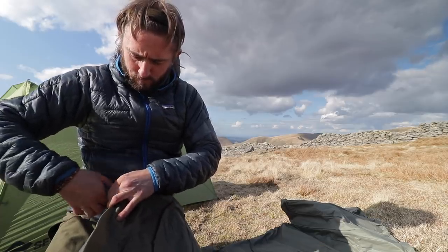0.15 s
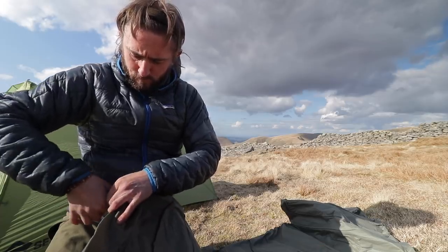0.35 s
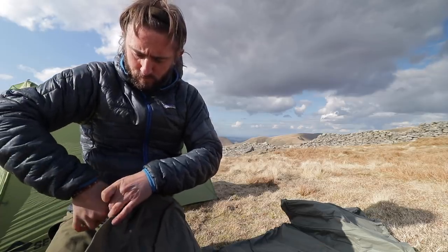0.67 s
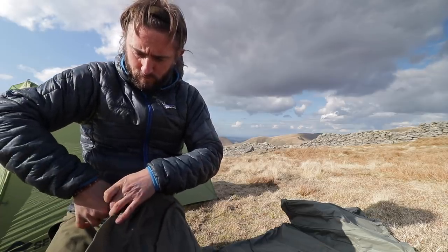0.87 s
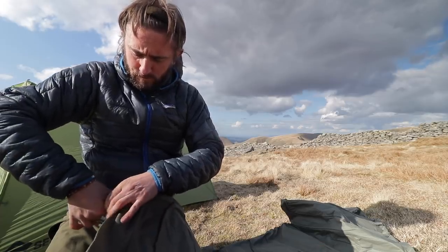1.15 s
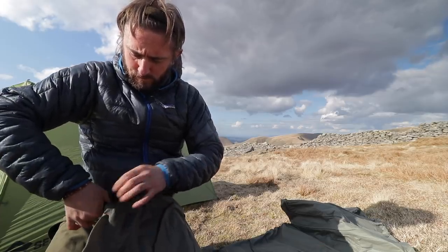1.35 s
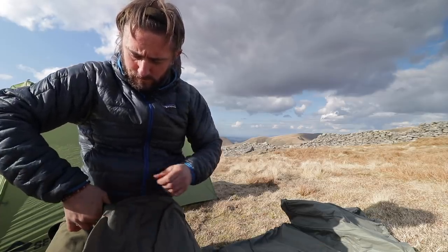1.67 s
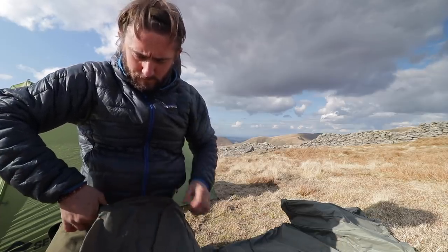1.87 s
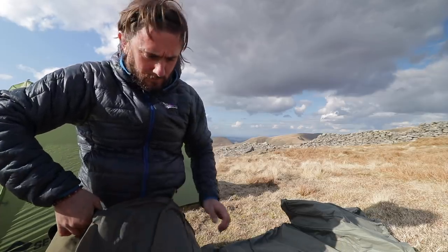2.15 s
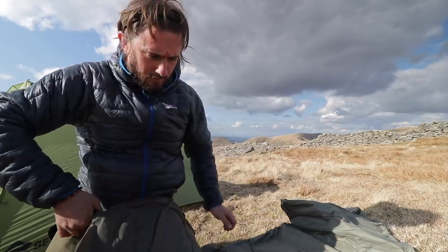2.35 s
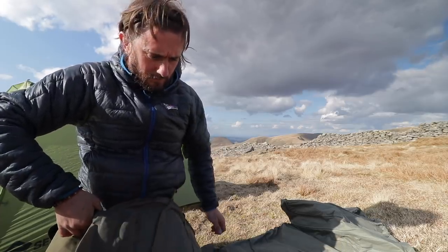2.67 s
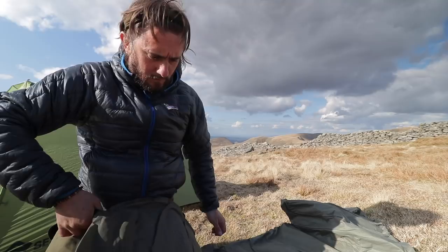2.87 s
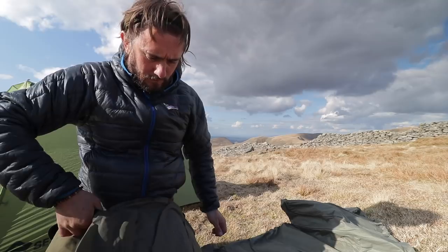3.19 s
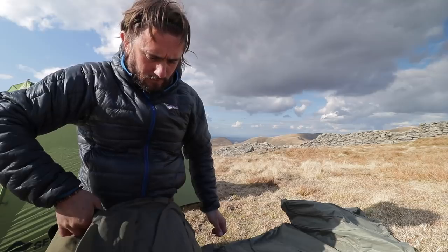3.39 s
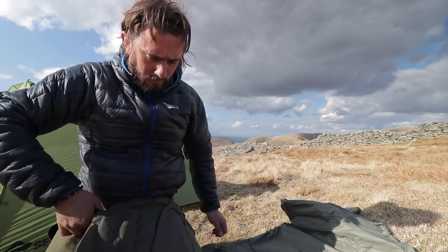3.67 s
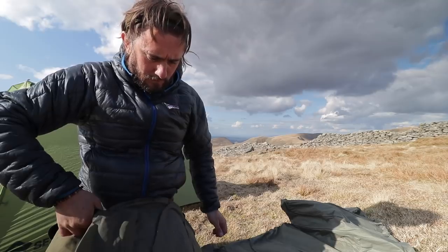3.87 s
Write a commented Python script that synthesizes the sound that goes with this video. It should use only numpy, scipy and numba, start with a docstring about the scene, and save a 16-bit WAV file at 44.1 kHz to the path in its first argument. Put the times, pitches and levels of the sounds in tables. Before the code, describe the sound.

A palm-sized electric pump blows air into a sleeping mat on an open hilltop, about a metre from the microphone. Its bright, rushing hiss and thin whine flutter while fingers work at the valve, with two faint dull knocks, then settle into an even drone once the hand lifts away. Soft low wind puffs sit underneath.

```python
"""A palm-sized battery pump blows air into a sleeping mat on a windy hilltop, a metre from one microphone.
Noise through resonances makes the rushing air; sines on multiples of the shaft speed make the impeller's whine.
A hand working round the valve shades the air and the tones, then lifts away; two dull knocks are its nudges.
Low filtered noise, swelling in puffs, is light wind on the microphone over a faint far hush."""
import sys
import numpy as np
from scipy import signal
from scipy.io import wavfile
from scipy.ndimage import uniform_filter1d
from numba import njit

SR = 44100
rng = np.random.default_rng(int(sys.argv[2]) if len(sys.argv) > 2 else 0)


def level_to_linear(level):
    """Convert decibel levels to linear amplitude factors, elementwise."""
    exponent = np.asarray(level, float) / 20
    return 10 ** exponent


def unload_audio(sound):
    """Save the sound as a 16-bit wav file, at the path given as the first command line argument."""
    columns = np.transpose(np.atleast_2d(sound))
    # keep every value between -1 and 1, then stretch to whole-number steps
    steps = np.round(np.clip(columns, -1, 1) * 32767)
    wavfile.write(sys.argv[1], SR, steps.astype(np.int16))


N = 177365
T = np.arange(N) / SR
AIR_FLICKER_DB, FLICKER_RATE_HZ = 0.35, 12


def curves(table):
    """Draws each column of a table as a line through time."""
    times, *columns = np.transpose(table)
    return [np.interp(T, times, column) for column in columns]


def bump(centre_s, length_s):
    """A smooth rise and fall from 0 to 1 and back."""
    phase = np.clip((T - centre_s) / length_s, -0.5, 0.5)
    return np.cos(np.pi * phase) ** 2


def walk(rate_hz):
    """Random levels, each held for 1 / rate and smoothed twice; their spread is near 1."""
    hold = int(SR / rate_hz)
    steps = np.repeat(rng.standard_normal(N // hold + 1), hold)
    smooth = uniform_filter1d(uniform_filter1d(steps, hold), hold)
    return 1.38 * smooth[:N]


@njit
def band_pass(x, hz, width_hz):
    """A resonance whose centre may move; a tone at the centre passes at its own level."""
    y, band, low = np.empty(len(x)), 0., 0.
    for i in range(len(x)):
        g = np.tan(np.pi * hz[i] / SR)
        damping = np.pi * width_hz / SR * (1 + g * g) / g
        v = (band + g * (x[i] - low)) / (1 + g * (g + damping))
        band, low, y[i] = 2 * v - band, low + 2 * g * v, damping * v
    return y


def ring(hz, width_hz, flicker_db):
    """Turbulence (noise) through the same resonance twice, set to rms 1, then flickering in level."""
    centre = hz * np.ones(N)
    air = rng.standard_normal(N)
    for _ in range(2):
        air = band_pass(air, centre, 1. * width_hz)
    return air / air.std() * level_to_linear(flicker_db * walk(FLICKER_RATE_HZ))


def rush(modes, flicker_db):
    """A group of resonances, each fed by its own eddies."""
    return sum(level_to_linear(db) * ring(hz, width, flicker_db) for hz, width, db in modes)


# fingers working on the valve: (time [s], cover [0-1], intake ring [Hz])
FINGERS = [(0.0, 0.09, 7050), (0.12, 0.03, 6950), (0.2, 0.3, 7100), (0.29, 0.54, 7400), (0.42, 1.0, 7480),
           (0.54, 0.76, 7500), (0.63, 0.7, 7350), (0.71, 0.57, 7800), (0.79, 0.62, 7250),
           (0.92, 0.44, 7500), (1.0, 0.5, 7300), (1.09, 0.55, 7300), (1.2, 0.3, 7230), (1.3, 0.44, 7300),
           (1.42, 0.44, 7260), (1.56, 0.22, 7060), (1.75, 0.0, 7340), (2.1, 0.17, 7120)]


def hand():
    """Shares of three hand positions (on the valve, hovering, gone), then the finger cover."""
    lifted = np.clip((T - 1.2) / 0.15, 0, 1)  # (T - start [s]) / time the move takes [s]
    gone = np.clip((T - 1.955) / 0.17, 0, 1)
    cover = curves(FINGERS)[0]
    return np.array([1 - lifted, lifted - gone, gone, cover])


# resonances of each air path, relative levels: (centre [Hz], width of each filter pass [Hz], level [dB])
HOUSING = [(1380, 510, -5.5), (1966, 710, -5), (2536, 790, -2.5), (3350, 530, -18)]
MAT = [(323, 140, -20.5), (473, 244, -11), (754, 430, 1)]
NOZZLE = [(3972, 470, 0)]
NOZZLE_UPPER = [(4467, 700, 1.5), (5360, 1050, -11.5)]
GAP = [(5800, 1400, -1.1), (6600, 900, -1.7)]
LEAK = [(8025, 340, 1), (8780, 2500, -0.5), (9820, 500, -1.2)]
TOP = [(10950, 1300, -5), (12250, 500, -13), (12300, 1200, -15), (12900, 510, -6.5), (13600, 800, -7.5),
       (14600, 900, -8), (15400, 900, -13)]
# how the hand sets each path's level; rows: housing, mat, nozzle, upper nozzle, gap, intake, leak, top
# (hand on valve [dB], hovering [dB], gone [dB], change at full cover [dB])
PATH_LEVELS = [(-41, -40.5, -41, -1.5), (-53, -52.5, -51.5, -0.5), (-47, -46, -49, -1.5),
               (-45, -47, -44.5, -10.5), (-46, -46.5, -52, -11.5), (-43.5, -41.5, -41.5, -7),
               (-59.5, -51, -53.5, 0.5), (-52, -51, -53, 1)]
# one band of the rushing air swells or fades for a moment:
# (centre time [s], length [s], path [name], change [dB])
AIR_SWELLS = [(0.039, 0.38, "housing", 1.5), (0.24, 0.56, "nozzle", -6), (0.58, .15, "nozzle", -4),
              (1.72, .5, "gap", 1), (0.45, .4, "gap", -3), (1.75, .45, "intake", 1.5),
              (1.17, .25, "gap", -4), (0.68, .16, "gap", 4), (1.58, .1, "leak", 3),
              (0.82, .12, "intake", -3), (0.99, 0.17, "nozzle", 5), (1.2, .25, "nozzle", 2),
              (0.29, 0.28, "intake", -7), (0.65, 0.27, "intake", 4), (0.99, .3, "intake", 1.5),
              (0.85, 0.56, "upper", -7.5), (1.28, 0.23, "upper", -7), (0.31, .4, "leak", 3.5),
              (0.85, .3, "top", -4), (1.08, .2, "top", 1), (1.38, .15, "gap", 4), (2.11, .2, "leak", -3.5)]


def airflow():
    """Rushing air rings each path; the hand shades every path differently and slides the intake's ring."""
    intake = [(curves(FINGERS)[1], 1000, -1)]  # centre [Hz], width [Hz], level [dB]
    paths = dict(housing=HOUSING, mat=MAT, nozzle=NOZZLE, upper=NOZZLE_UPPER,
                 gap=GAP, intake=intake, leak=LEAK, top=TOP)
    pose = hand()
    _, hovering, gone, _ = pose
    levels_db = dict(zip(paths, np.array(PATH_LEVELS) @ pose))
    for centre, length, name, db in AIR_SWELLS:
        levels_db[name] = levels_db[name] + db * bump(centre, length)
    # while the hand is near, its small movements stir the treble paths
    for name in "upper", "gap", "intake", "leak":
        levels_db[name] = levels_db[name] + 0.6 * (1 - gone) * walk(9)
    air = sum(level_to_linear(levels_db[name]) * rush(modes, AIR_FLICKER_DB) for name, modes in paths.items())
    # the bounce off the ground weakens a narrow band: centre 1018 Hz, width 93 Hz
    air = air - 0.65 * band_pass(air, 1018 * np.ones(N), 93.)
    # a second dip opens by half as the hand hovers, fully once it has gone
    dip_depth = 0.61 * (hovering / 2 + gone)
    return air - dip_depth * band_pass(air, 2173 * np.ones(N), 170.)


# the fingers part suddenly and close again slowly: (start time [s], length [s], opening [0-1])
PARTINGS = [(-0.05, .28, 0.9), (0.58, .34, 0.7), (0.964, 0.44, 0.65)]


def parted():
    """How far the fingers stand apart: a quick opening, then a slow close."""
    total = 0
    for start, length, opening in PARTINGS:
        opened = np.clip((T - start) / 0.025, 0, 1)
        closing = np.clip(2 - 2 * (T - start) / length, 0, 1)
        total = total + opening * opened * closing
    return total


# shaft speed before its small random hunting: (time [s], speed [Hz])
SHAFT_SPEED = [(0.0, 620.9), (0.17, 618.7), (0.31, 619.1), (0.4, 617.9), (0.63, 616.8), (0.79, 619.2),
               (0.94, 617.9), (0.99, 616.0), (1.25, 619.3), (1.37, 619.0), (1.45, 620.0), (1.53, 618.0),
               (1.68, 623.3), (1.85, 625.6), (1.97, 623.4), (2.11, 625.4), (2.22, 624.4), (2.36, 626.0),
               (2.75, 626.7), (2.86, 628.1), (2.94, 626.5), (3.08, 625.7), (3.2, 627.8), (3.42, 628.5),
               (3.54, 625.8), (3.71, 624.3), (3.8, 622.7), (4.02, 623.6)]
# shaft tones that the hand shades: (multiple of shaft speed, hand on valve [dB], hovering [dB], gone [dB],
# change at full cover [dB], change with fingers parted [dB], change with speed once gone [dB per Hz])
TONES = [(3, -54.5, -49.5, -48.5, -8, 3, 0.2), (5, -57.5, -66, -55, 5, -1, 1.0),
         (8, -60.5, -56.5, -61, -1, 3, 0.1), (9, -44, -42, -49.5, -9, 0.3, 0.6),
         (10, -65.5, -72, -74, -3, 0.1, 0.1), (15, -62, -74, -74, 0, 0.1, -4),
         (16, -64, -63, -62, 5, 11, -0.5), (17, -57.5, -64, -62, 5.5, 0, -1.0),
         (18, -51, -47.5, -55.5, 0.5, 0.2, 1.9), (19, -62, -56, -57.5, -3, 5, -1),
         (20, -73, -70, -73, 9, -3, 4), (21, -64, -69, -62.5, -2, 3, 0.1), (22, -71, -70, -73, 1, 10, 0.1),
         (23, -67, -72, -68, 1, 14, -0.5), (24, -59, -59, -61, -5, 1, -1.2),
         (25, -74, -72, -74, -2, 15, 0.1)]
# one tone of the whine swells or fades for a moment:
# (centre time [s], length [s], multiple of shaft speed, change [dB])
TONE_SWELLS = [(0.04, .3, 9, 9), (2, .4, 25, -12), (0.25, 0.65, 5, 5), (0.07, .2, 18, 4.5),
               (0.21, .1, 18, -3), (0.31, .18, 18, 9), (0.84, .3, 9, 5), (0.4, .12, 9, -1),
               (0.52, .14, 9, 3), (0.7, .12, 9, 5), (1.0, .14, 9, -4), (1.27, .35, 9, 2), (0.8, .5, 5, 2),
               (0.76, .3, 18, -5.5), (1.01, .12, 18, -3), (1.35, .4, 5, -14), (1.25, .3, 18, -10),
               (1.4, .35, 24, 5), (1.5, 0.53, 18, -9), (1.7, .25, 5, 13), (2.02, .25, 19, -12),
               (2.12, 0.4, 9, 7.5), (3, .4, 16, 6), (2.25, 0.58, 18, -8), (3.5, .6, 17, -8),
               (4.5, .3, 5, -14), (1.5, .35, 16, -6), (0.08, .3, 21, 7), (0.05, .3, 19, -4),
               (2, .3, 17, -1), (0.8, .2, 16, 5), (1.1, .6, 10, 7), (1.25, .3, 15, 5), (2, 0.26, 5, 4.5),
               (3.5, .6, 5, 2), (0, .4, 8, 5), (1.25, .25, 21, 3), (2.05, .2, 23, 6)]
# weaker tones that only waver: (multiple of shaft speed, level [dB])
WEAK_TONES = [(2, -61), (4, -58), (6, -60.5), (13, -76)]


def impeller():
    """The nine-bladed wheel's whine: sines locked to a slightly hunting shaft, each wavering alone."""
    speed_hz = curves(SHAFT_SPEED)[0]
    turns = np.cumsum(speed_hz + 0.2 * walk(45.76)) / SR
    pose = hand()
    gone = pose[2]
    controls = np.vstack([pose, parted(), gone * (speed_hz - 626)])  # 626 Hz: cruising speed
    levels_db = {round(multiple): np.array(row) @ controls for multiple, *row in TONES}
    for centre, length, multiple, db in TONE_SWELLS:
        key = round(multiple)
        levels_db[key] = levels_db[key] + db * bump(centre, length)
    levels_db[3] = levels_db[3] + 2 * walk(60)  # the third multiple sounds rough
    for multiple, db in WEAK_TONES:
        levels_db[round(multiple)] = db + 1.5 * walk(3.9)
    whine = np.zeros(N)
    for multiple, db in levels_db.items():
        rms = level_to_linear(db + 0.7 * walk(29.85))
        whine += np.sqrt(2) * rms * np.sin(2 * np.pi * (multiple * turns + rng.random()))
    return whine


# puffs of wind: (centre time [s], length [s], rise over the breeze [dB])
GUSTS = [(0.35, .3, 4), (1.2, .15, 3), (1.872, 0.77, 12), (2.15, .25, 6), (2.38, .4, 9), (2.66, 0.26, 12),
         (2.93, 0.18, 12), (3.17, .2, 8), (3.45, .35, 4), (3.77, .15, 7), (4.02, .15, 4)]
# far hush under the pump: (centre [Hz], width of each filter pass [Hz], level [dB])
HUSH = [(170, 330, -77.5)]


def wind():
    """Low rumble of air on the microphone, swelling in puffs, over a faint far hush."""
    breeze_db = -73
    gust_db = breeze_db + sum(db * bump(centre, length) for centre, length, db in GUSTS)
    rumble = level_to_linear(gust_db) * ring(26.6, 40.4, flicker_db=1.5)
    return rumble + rush(HUSH, AIR_FLICKER_DB)


# a finger nudges the valve: (time [s], level before the soft onset and decay [dB])
NUDGES = [(0.677, -39), (1.184, -40)]


def nudges():
    """Short dull plastic knocks: a dying sine with a soft fingertip onset."""
    pitch_hz, rise_s, t60_s = 380, 0.001, 0.018  # t60: time for the decay to fall 60 dB
    out = np.zeros(N)
    for start, db in NUDGES:
        age = np.maximum(T - start, 0)
        onset = 1 - np.exp(-age / rise_s)
        decay = np.exp(-np.log(1000) * age / t60_s)
        out += level_to_linear(db) * np.sin(2 * np.pi * pitch_hz * age) * onset * decay
    return out


def scene():
    """One microphone hears everything and feeds both channels."""
    mono = airflow() + impeller() + wind() + nudges()
    return np.tile(mono, (2, 1))


def roll_off(x):
    """The treble ends steeply here."""
    return signal.sosfilt(signal.butter(12, 15970, fs=SR, output="sos"), x)


def record(dry):
    """The recorder steeply cuts everything above 15690 Hz."""
    top_cut = signal.ellip(16, 0.3, 60, 15690, fs=SR, output="sos")
    mix = signal.sosfilt(top_cut, dry)
    return roll_off(mix)


dry = scene()
out = record(dry)
unload_audio(out)
```